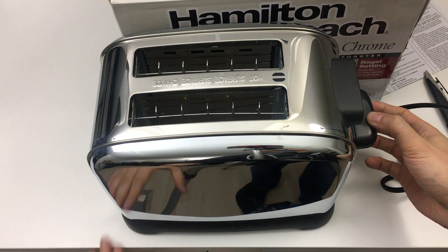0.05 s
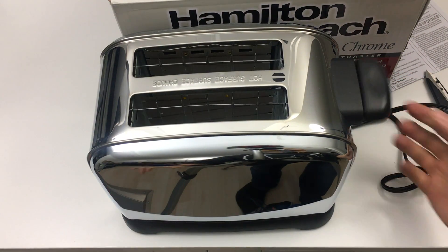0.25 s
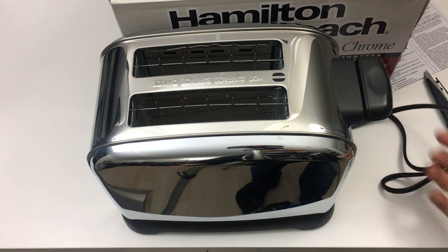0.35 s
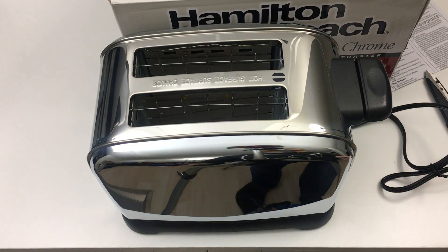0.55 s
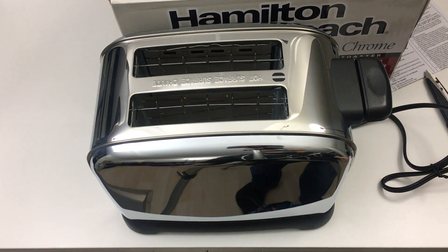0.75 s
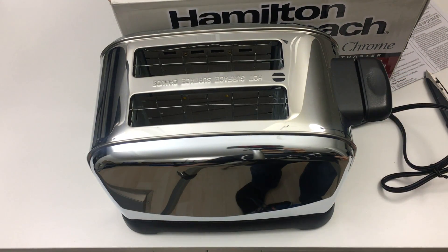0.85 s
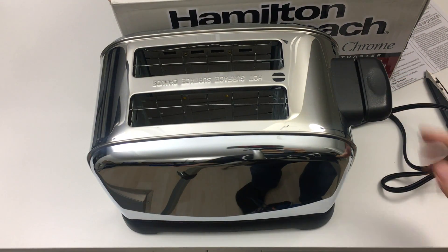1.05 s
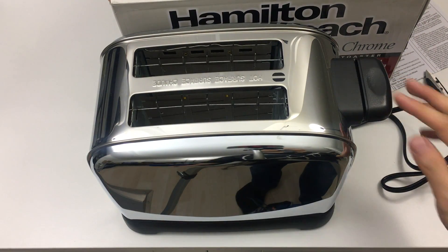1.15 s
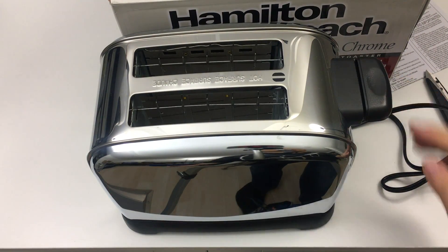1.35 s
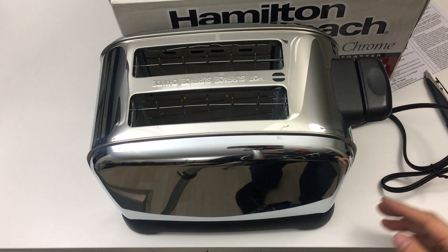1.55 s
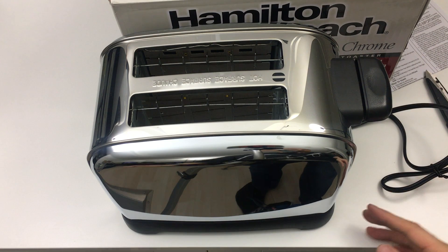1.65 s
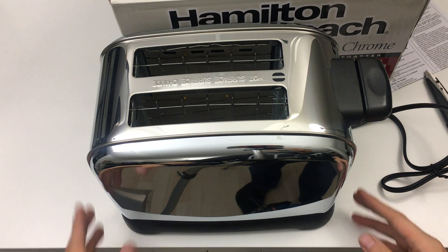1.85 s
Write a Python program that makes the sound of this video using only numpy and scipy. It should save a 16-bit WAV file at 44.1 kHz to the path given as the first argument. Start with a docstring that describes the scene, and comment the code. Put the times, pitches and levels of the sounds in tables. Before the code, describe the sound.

Toaster lever springs up: quick scrape, hard metallic clack, rattling wires, then faint ticks over low hum

```python
"""A steel toaster on a table pops up, over a low ventilation hum that lasts throughout.
After a very faint rustle the sprung carriage scrapes up its guide (tiny metal contacts) and slams into its stop.
The wire racks rattle to rest, the shell booms and the spring sings: ringing notes that build up and die.
A few faint ticks, taps and lever clicks follow (short bursts of filtered noise).
The walls of a small room answer every toaster sound with a fading tail."""
import sys
import numpy as np
from scipy import signal
from scipy.fft import rfft, irfft
from scipy.io import wavfile

SR = 44100
rng = np.random.default_rng(int(sys.argv[2]) if len(sys.argv) > 2 else 0)


def generate_wav(sig):
    """Save sig (samples, or channels by samples) to the path in sys.argv[1] as 16-bit PCM at SR."""
    pcm = np.round(np.clip(np.atleast_2d(sig).T, -1, 1) * 32767).astype(np.int16)
    wavfile.write(sys.argv[1], SR, pcm)


N = 83790
T = np.arange(N) / SR  # time of each sample [s]
RING_SIZE = 2 ** 15  # length of a single ringing sound [samples]
RING_T = T[:RING_SIZE]
# frequency axes [Hz] for the whole scene and for one ringing sound
FREQS = np.maximum(np.fft.rfftfreq(N, 1 / SR), 1)
RING_FREQS = np.maximum(np.fft.rfftfreq(RING_SIZE, 1 / SR), 1)


def amp(db):
    """Turn decibels into a gain."""
    return 10 ** (np.asarray(db) / 20)


def unit(x):
    """Scale a signal to an rms of 1."""
    return x / np.sqrt(np.mean(x ** 2))


def fade(t60, size=N):
    """Exponential decay that falls by 60 dB in t60 seconds."""
    return np.exp(-np.log(1000) * T[:size] / t60)


def swell(hz, t60):
    """Envelope of a resonance: it takes a few cycles to build up, so low notes come late, then fades."""
    build_cycles = 1.9
    build_up = 1 - np.exp(-RING_T * hz / build_cycles)
    return build_up * fade(t60, RING_SIZE)


def noise(db):
    """Random noise of rms 1, shaped by the given dB at each frequency."""
    size = 2 * (len(db) - 1)
    spectrum = rfft(rng.standard_normal(size))
    return unit(irfft(spectrum * amp(db)))


def colour(points, freqs=RING_FREQS):
    """Join (frequency [Hz], level [dB]) points by straight lines on a log-frequency axis."""
    hz, db = np.array(points).T
    return np.interp(np.log(freqs), np.log(hz), db)


def burst(db, t60):
    """Fading noise with energy 1, like a dense cloud of dying notes."""
    cloud = noise(db)
    return unit(cloud * fade(t60, len(cloud))) / np.sqrt(len(cloud))


def ring(modes):
    """What one sharp tap sounds like: the sum of the object's notes (Hz, dB, t60 s)."""
    return sum(amp(db) * np.sin(2 * np.pi * hz * RING_T) * swell(hz, t60) for hz, db, t60 in modes)


def through(x, response):
    """Let a force or sound pass through an object or room (convolution)."""
    return signal.fftconvolve(x, response)[:N]


def at(s, x):
    """Start a sound s seconds into the scene."""
    return np.pad(x, (int(s * SR), N))[:N]


def knocks(rows):
    """Make one sharp tap for each (s, dB) row."""
    return sum(at(s, amp(db) * (T == 0)) for s, db in rows)


def grains(size=N):
    """Dense tiny metal contacts of uneven size and random sign, at rms 1."""
    contacts_per_s = 4000
    hit = rng.random(size) < contacts_per_s / SR
    sign = np.sign(rng.uniform(-1, 1, size))
    strength = amp(rng.uniform(-6.05, 5.5, size))  # dB range of single contacts
    return unit(hit * sign * strength)


def steel(force):
    """Thin steel rings a little differently at each touch: a short clink and a longer shimmer."""
    # colour of the thin steel: (frequency [Hz], level [dB])
    steel_colour = [(30, -35.5), (130, -8), (400, -0.5), (650, -9.5), (1100, -5), (1500, -2.5), (2000, 1.5),
                    (3300, 0.5), (4200, 0.5), (5200, -3.5), (7100, 0), (8500, -2.5), (10300, -6),
                    (12200, -1.5), (15500, -6.5)]
    clink_t60_s, shimmer_t60_s, shimmer_db = 0.022, 0.52, -10.5
    clink = unit(fade(clink_t60_s, RING_SIZE))
    shimmer = unit(fade(shimmer_t60_s, RING_SIZE))
    envelope = np.hypot(clink, amp(shimmer_db) * shimmer)
    return through(force, noise(colour(steel_colour)) * envelope / np.sqrt(RING_SIZE))


def ventilation():
    """Ventilation: low rumbling noise plus steady tones whose loudness and phase waver slowly."""
    # colour of the rumble: (frequency [Hz], level [dB])
    air_colour = [(20, -34.5), (35, -12.5), (52, 4.5), (80, -3.5), (130, -11.5), (190, -14.5), (370, -25.5),
                  (600, -28.5), (1000, -31.5), (2000, -39), (5000, -45), (15000, -50.5)]
    # tones of the hum: (frequency [Hz], rms level [dB])
    hum_tones = [(74.5, -59.5), (122, -68), (223, -80), (299, -77), (373, -81)]
    air_db = -57
    waver = 0.39  # rms, as a share of the loudness and in radians of phase
    slow = -20 * np.log10(1 + (FREQS / 5) ** 2)  # keeps mostly changes below 5 Hz
    hum = 0
    for hz, db in hum_tones:
        loudness = amp(db) * np.sqrt(2) * (1 + waver * noise(slow))
        phase = 2 * np.pi * hz * T + waver * noise(slow)
        hum = hum + loudness * np.sin(phase)
    return hum + amp(air_db) * noise(colour(air_colour, FREQS))


def ticks():
    """Small ticks and taps: each is noise around one resonance that builds up and dies away."""
    # ticks and taps: (time [s], level [dB], frequency [Hz], width [octaves], t60 [s])
    tick_list = [(.881, -61, 1963, 1.3, 0.079), (0.987, -66.5, 1367, 0.073, .18),
                 (1.381, -70, 2074, .2, 0.047), (1.4289, -53, 11000, 0.76, .007),
                 (1.432, -55, 7470, 1.2, 0.0053), (1.557, -75.5, 3940, 0.17, 0.25),
                 (1.74, -53.5, 293.7, 0.68, 0.11), (1.7433, -68, 3830, 1.16, 0.12),
                 (1.758, -69.5, 3950, 1.9, 0.27), (1.8444, -53, 1067, .12, 0.037)]
    out = 0
    for s, db, hz, width, t60 in tick_list:
        octaves_away = np.log2(RING_FREQS / hz)
        band = noise(-40 * np.log10(1 + (octaves_away / width) ** 2))
        out = out + at(s, amp(db) * band * swell(hz, t60))
    return out


def lever():
    """Small plastic clicks: a fingertip brushes the loose lever and it clicks in its slot."""
    # clicks: (time [s], level [dB])
    click_list = [(1.299, -54), (1.314, -59.5), (1.3271, -58.5), (1.3928, -72)]
    # colour of the plastic: (frequency [Hz], level [dB])
    lever_colour = [(800, -22.5), (2150, 1.5), (3300, -14), (7400, -17), (8250, -1), (9100, -13),
                    (16000, -21)]
    t60_s = 0.053
    out = 0
    for s, db in click_list:
        click = noise(colour(lever_colour)) * fade(t60_s, RING_SIZE)
        out = out + at(s, amp(db) * click)
    return out


def spring():
    """The spring sings unsteadily, kicked as the carriage settles and damped once it rests."""
    # long notes of the spring: (frequency [Hz], level [dB], t60 [s])
    spring_notes = [(533.5, -55.5, 0.67), (1739, -55, 0.6), (2286, -52, 0.8), (2798, -46.5, 0.3),
                    (3174, -43.5, 0.44)]
    # kicks to the spring: (time [s], strength [dB])
    kicks = [(.486, -2), (.586, -2), (.652, -7), (.765, -16.5)]
    waver, waver_hz = 0.53, 28  # rms share of the loudness, and how fast it changes
    rest_s, damping_db_per_s = 0.887, 200
    waver_colour = -20 * np.log10(1 + (FREQS / waver_hz) ** 2)
    song = 0
    for note in spring_notes:
        unsteady = 1 + waver * noise(waver_colour)
        song = song + unsteady * through(knocks(kicks), ring([note]))
    return song * amp(-damping_db_per_s * np.maximum(T - rest_s, 0))


def shell():
    """Jolts and a shudder while the carriage moves set the shell's low notes booming on the table."""
    # notes of the shell: (frequency [Hz], relative level [dB], t60 [s])
    shell_notes = [(76.54, -7.5, 0.52), (113.6, -5.5, 0.15), (152.7, -2.5, 0.16), (188.8, 2.5, .24),
                   (351.8, -3.5, 0.26), (430.3, -3.5, 0.14)]
    # jolts to the shell: (time [s], strength [dB])
    jolts = [(.2, -10), (.292, 4.5), (.311, 4), (.345, -8.5), (.486, -15)]
    shell_db, shudder_db = -28.5, -42.5  # the shudder is a force, relative to the jolts
    from_s, to_s = .2, .56
    shudder = amp(shudder_db) * grains() * (T > from_s) * (T < to_s)
    return through(knocks(jolts) + shudder, ring(shell_notes)) * amp(shell_db)


def scrape():
    """A very faint rustle, then the carriage's scrape: tiny contacts shake steel; gives sound and force."""
    # loudness of a very faint rustle before .18 s, then of the scrape: (time [s], level [dB])
    contact_level = [(0.019, -80), (.075, -70), (.175, -75.5), (0.206, -46), (0.228, -36), (0.241, -25.5),
                     (.257, -28), (.278, -30.5), (0.294, -29), (.325, -33), (.37, -36), (.43, -46.5),
                     (.51, -37), (0.548, -51), (.585, -49)]
    stretch_s = .035
    when, db = np.array(contact_level).T
    force = grains() * amp(np.interp(T, when, db, left=-np.inf, right=-np.inf))
    # the carriage's point of contact travels, so each overlapping stretch gets a new steel colour
    sound = 0
    for s in np.arange(when[0], when[-1] + stretch_s, stretch_s):
        blend = np.sqrt(np.maximum(1 - np.abs(T - s) / stretch_s, 0))
        sound = sound + steel(force * blend)
    return sound, force


def rattles():
    """The racks chatter: fading runs of tiny contacts, dull or bright; gives sound and force."""
    # rattles: (time [s], level [dB], length [s], treble tilt [dB per octave])
    rattle_list = [(0.1967, -49.5, 0.039, -5), (0.222, -31.5, 0.0058, 2), (0.234, -27, 0.0072, 4.5),
                   (0.251, -37.5, 0.0091, 14), (0.287, -42, 0.034, 11), (0.313, -21.5, 0.021, -0.5),
                   (0.324, -32, 0.005, 9), (0.3505, -22, 0.0045, -1), (0.4454, -28.5, 0.0097, 1.5),
                   (0.483, -29.5, 0.0077, -0.5), (0.5296, -31, 0.019, -0.5), (0.544, -29.5, 0.0016, -1),
                   (0.5878, -47, 0.027, -3.5), (0.6028, -41, 0.026, -0.5), (0.6426, -47.5, 0.035, -1.5),
                   (0.701, -61.5, 0.14, -3)]
    tilt_centre_hz = 5060
    octaves = np.log2(np.maximum(RING_FREQS / tilt_centre_hz, .1))
    sound, force = 0, 0
    for s, db, length, tilt in rattle_list:
        contacts = irfft(rfft(grains(RING_SIZE)) * amp(tilt * octaves))
        dying = np.exp(-np.minimum(RING_T / length, 10) ** 2)
        chatter = amp(db) * contacts * dying
        sound = sound + at(s, steel(chatter))
        force = force + at(s, chatter)
    return sound, force


def racks():
    """Scrape and rattles also excite the wires' notes; the racks jump and knock after the clack."""
    # long notes of the rack wires: (frequency [Hz], relative level [dB], t60 [s])
    wire_notes = [(1019, -1.5, .3), (1105, 1.5, 0.25), (1345, -6, 0.19), (1873, 0.5, 0.21),
                  (2545, -2.5, 0.23), (2770, -1, 0.13), (3140, -4, 0.1), (3187, 4.5, .2),
                  (3890, -3.5, 0.24)]
    # the racks knock against the frame: (time [s], level [dB])
    rack_knocks = [(.3235, -26.5), (.331, -21), (.353, -22.5)]
    wires_db = -52
    scrape_sound, scrape_force = scrape()
    rattle_sound, rattle_force = rattles()
    wires = amp(wires_db) * through(scrape_force + rattle_force, ring(wire_notes))
    knocking = through(knocks(rack_knocks), ring([(3120, 0, 0.043)]))  # one note: Hz, dB, t60 s
    return scrape_sound + rattle_sound + wires + knocking


def clack():
    """The carriage hits its stop and bounces: frame notes plus a crack; longer contacts sound duller."""
    # blows on the stop: (time [s], strength [dB], contact time [ms])
    blows = [(0.307, 3.5, .04), (0.3097, 4, 0.11), (0.311, -6.5, .2), (0.3158, -6, .1)]
    # notes of the stop and frame: (frequency [Hz], relative level [dB], t60 [s])
    stop_notes = [(416.6, -10, 0.11), (544, -17.5, 0.061), (737, -12.5, 0.053), (1041, -6.5, 0.035),
                  (1124, -13, .05), (2147, -3, 0.03), (2463, -1, .03), (2520, -2, 0.056), (3060, -6, .05),
                  (3560, -8, 0.04), (3915, -5, 0.13), (4280, -9.5, 0.045)]
    # colour of the crack: (frequency [Hz], level [dB])
    crack_colour = [(30, -33.5), (110, -16.5), (400, -8), (1500, -6), (2500, 3), (4200, -0.5),
                    (6000, -17.5), (16000, -31)]
    stop_db, crack_db, crack_t60_s = -22.5, -1, 0.016
    frame = amp(stop_db) * ring(stop_notes)
    out = 0
    for s, db, contact_ms in blows:
        push = np.exp(-RING_T / (contact_ms / 1000))
        push = push / np.sqrt(push.sum())
        blow = frame + amp(crack_db) * burst(colour(crack_colour), crack_t60_s)
        out = out + amp(db) * at(s, through(blow, push))
    return out


def room(direct):
    """Reflections from the walls of a small room: a fading noise tail in which the bass lingers."""
    t60_s, level_db, top_hz = 0.34, -13, 4960
    bass_t60_s, bass_db, bass_hz = 1.1, -22.5, 710
    walls = amp(level_db) * burst(-10 * np.log10(1 + (FREQS / top_hz) ** 2), t60_s)
    bass = amp(bass_db) * burst(-20 * np.log10(1 + (FREQS / bass_hz) ** 2), bass_t60_s)
    return through(direct, at(.006, walls + bass))  # the tail starts 6 ms late


def scene():
    """Add up the small sounds and the toaster, their reflections and the ventilation."""
    direct = ticks() + lever() + spring() + shell() + racks() + clack()
    return (direct + room(direct) + ventilation())[None]


def record(dry):
    """The microphone drops the deep bass; the recorder cuts the top."""
    mic_low_hz, top_hz = 43, 15850
    bass_cut = signal.butter(2, mic_low_hz, "high", fs=SR, output="sos")
    top_cut = signal.ellip(12, .1, 80, top_hz, fs=SR, output="sos")
    return signal.sosfilt(top_cut, signal.sosfilt(bass_cut, dry))


dry = scene()
out = record(dry)
generate_wav(out)
```